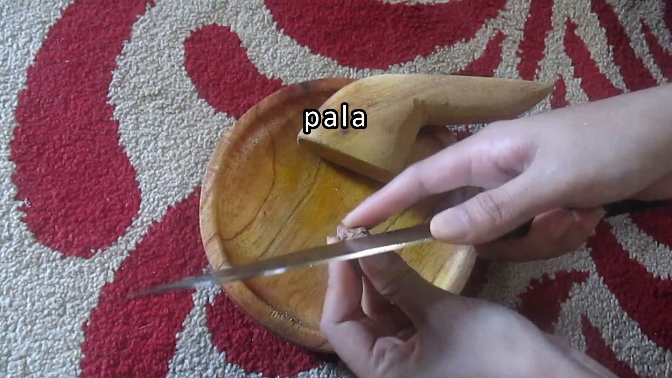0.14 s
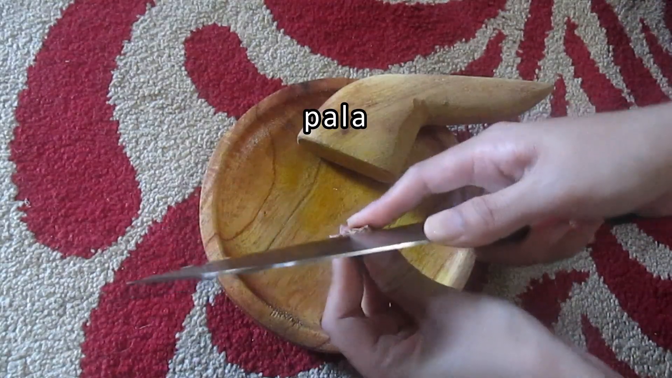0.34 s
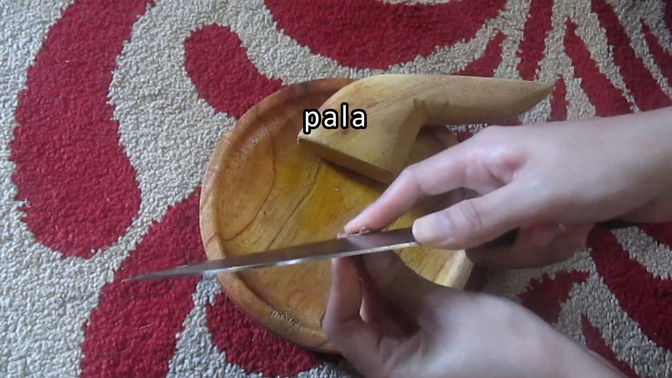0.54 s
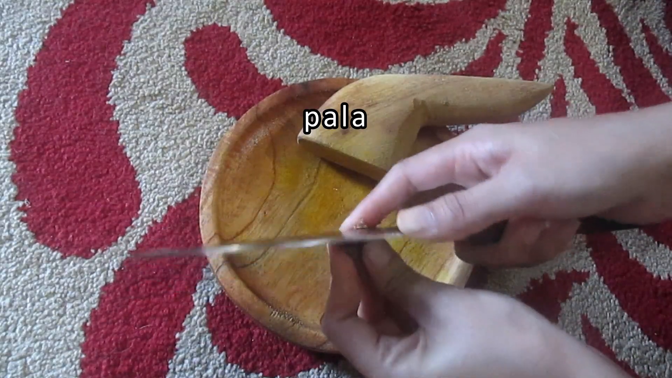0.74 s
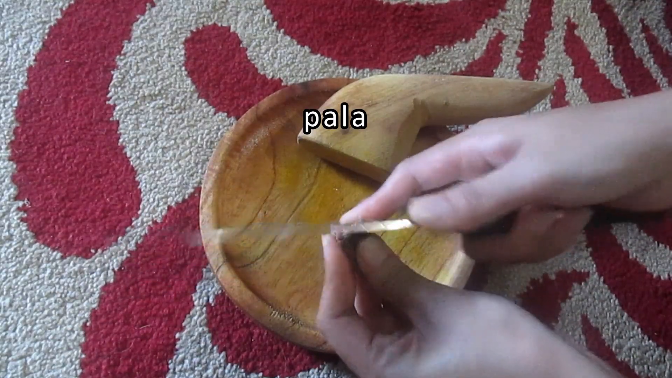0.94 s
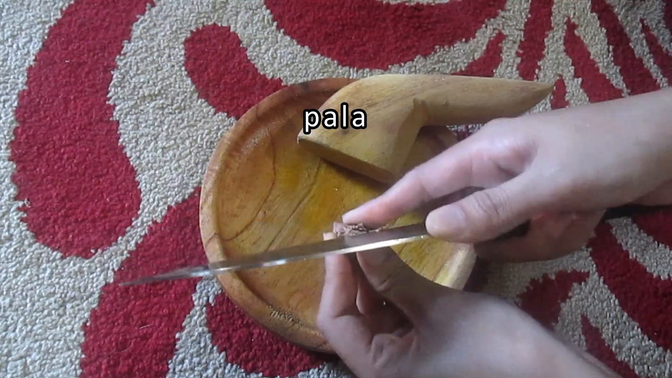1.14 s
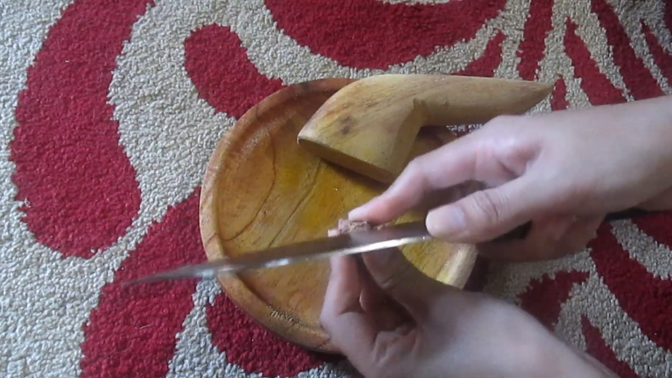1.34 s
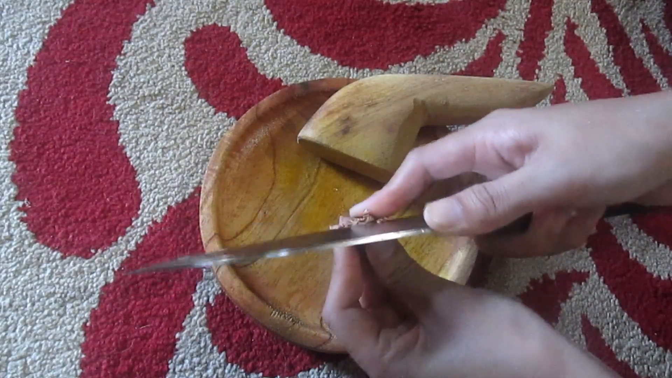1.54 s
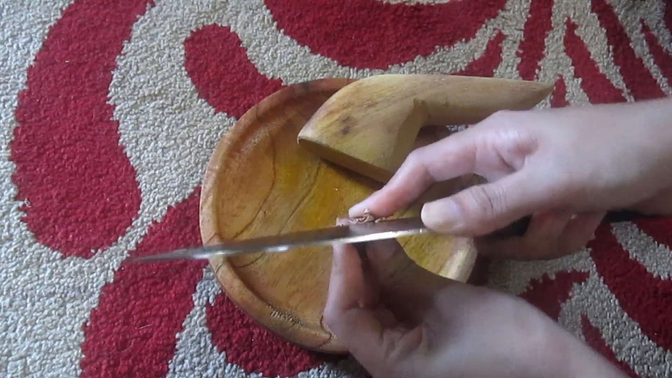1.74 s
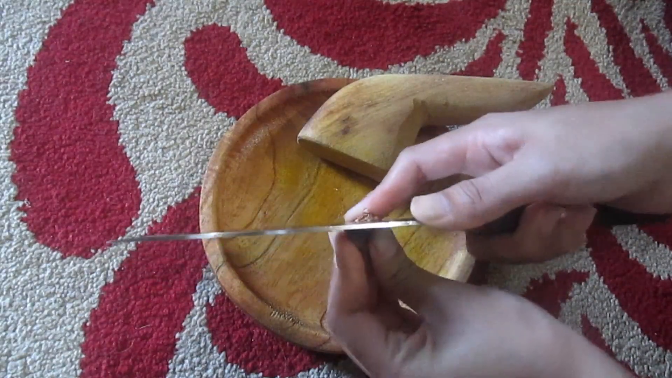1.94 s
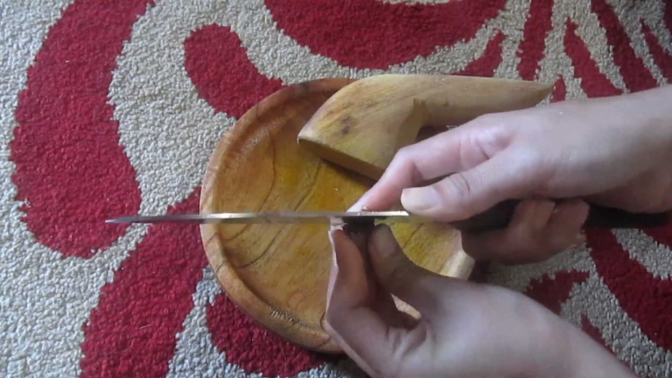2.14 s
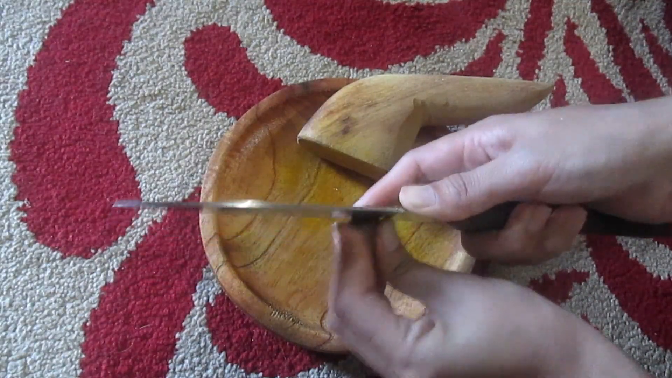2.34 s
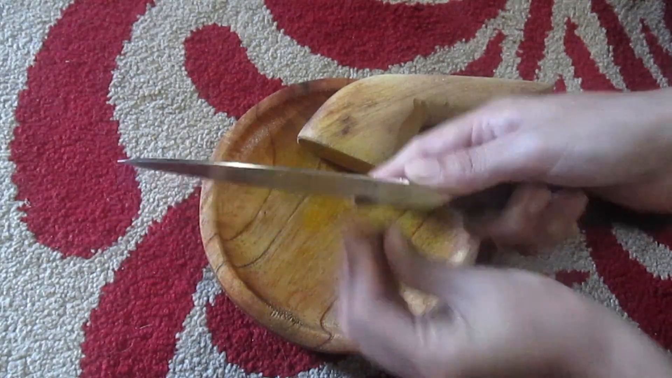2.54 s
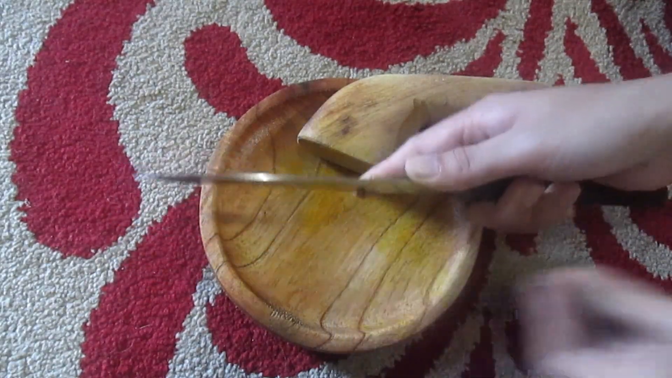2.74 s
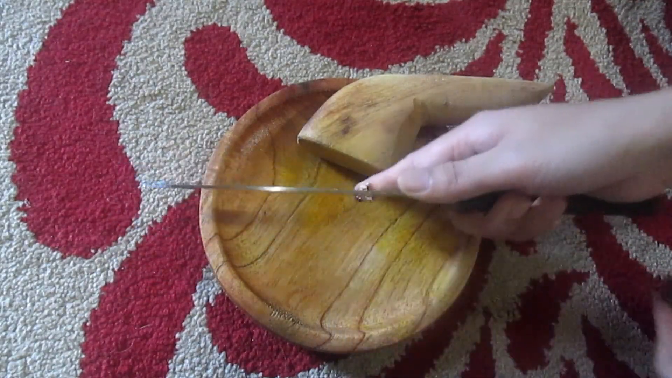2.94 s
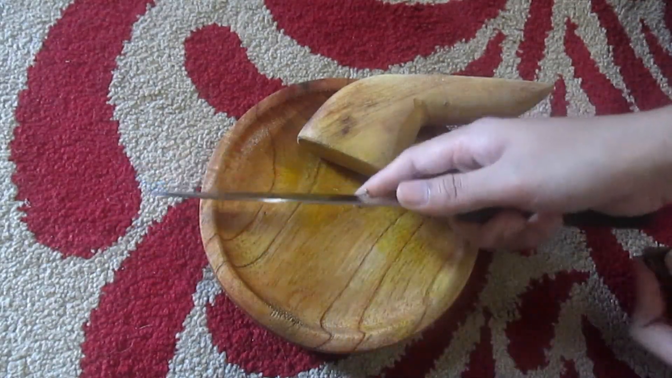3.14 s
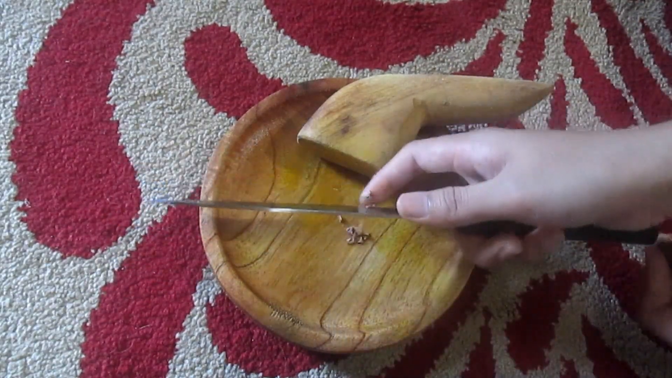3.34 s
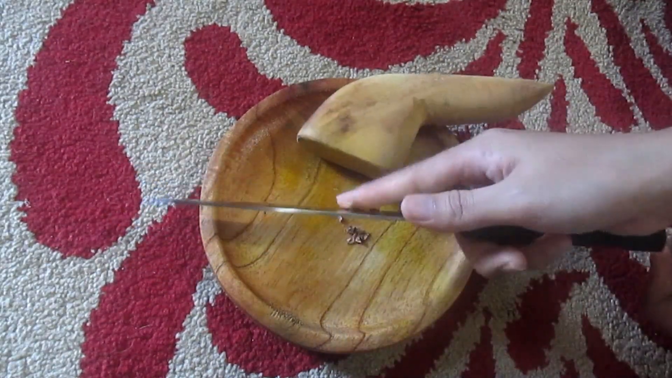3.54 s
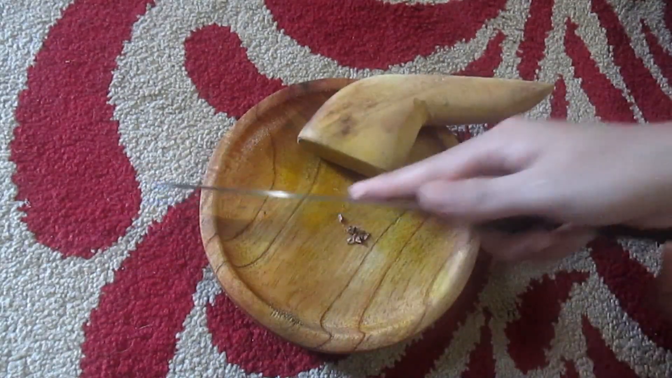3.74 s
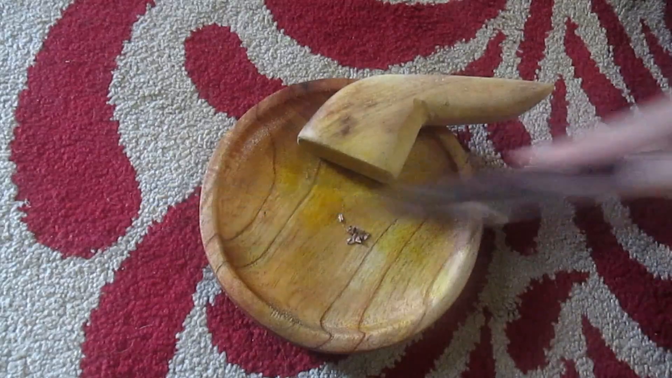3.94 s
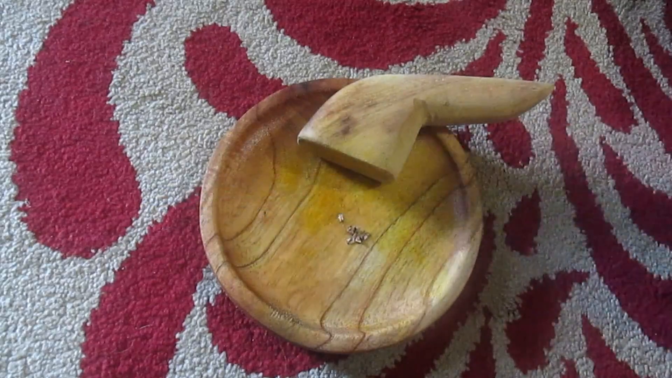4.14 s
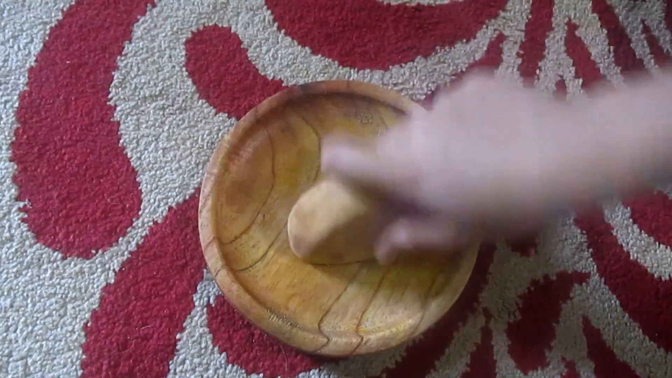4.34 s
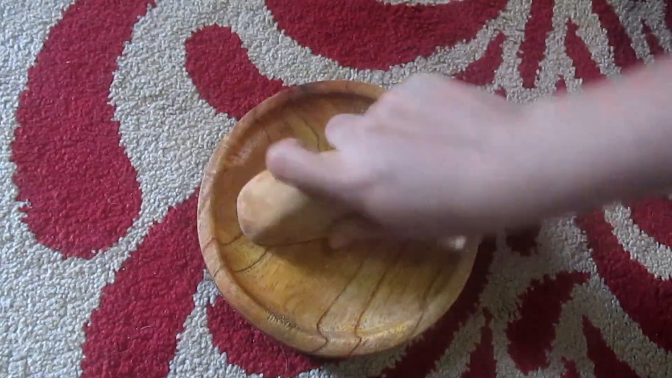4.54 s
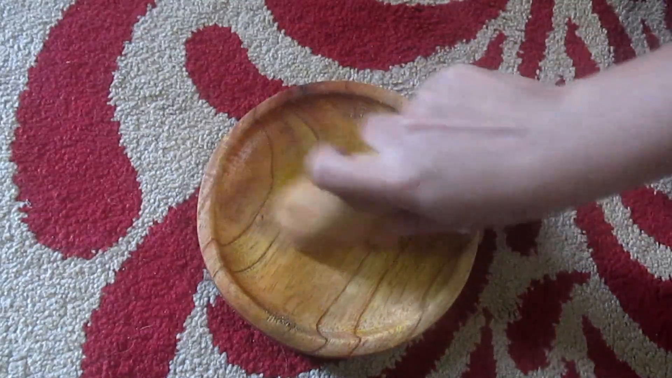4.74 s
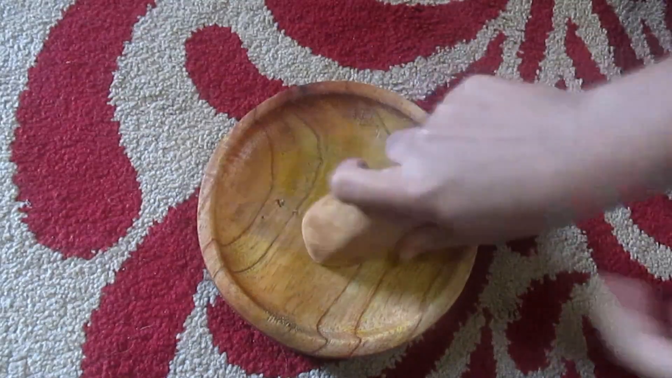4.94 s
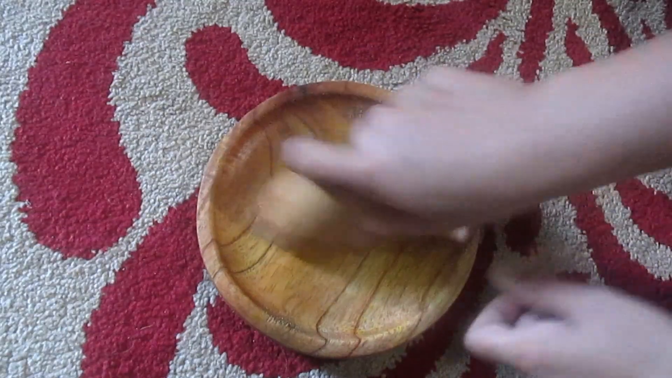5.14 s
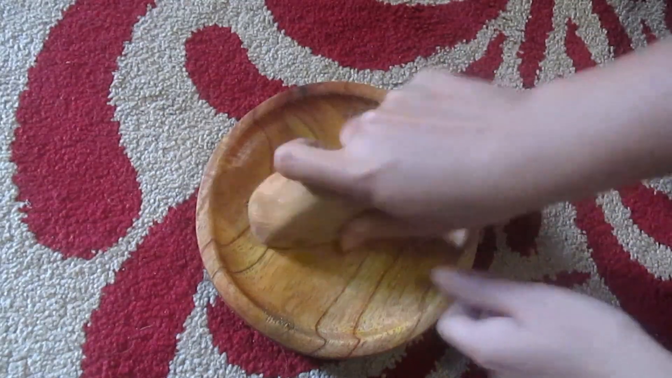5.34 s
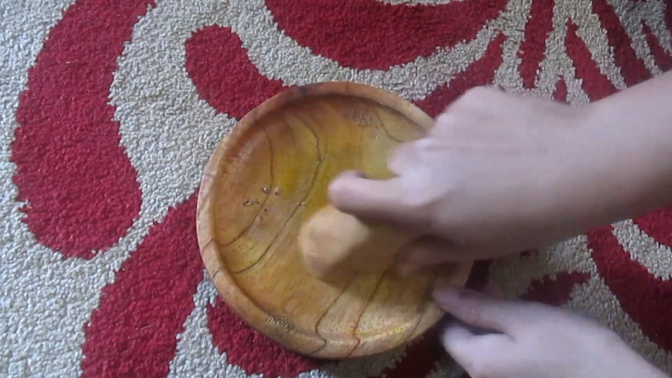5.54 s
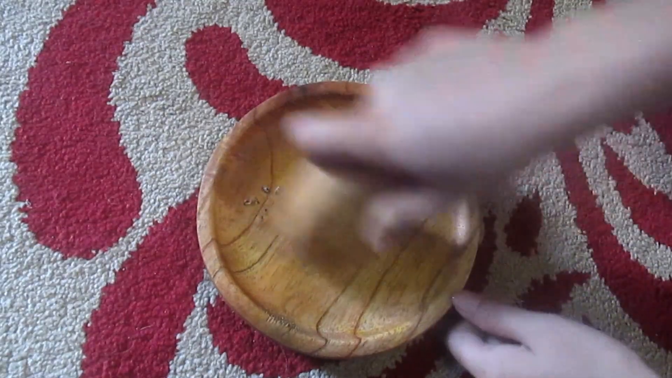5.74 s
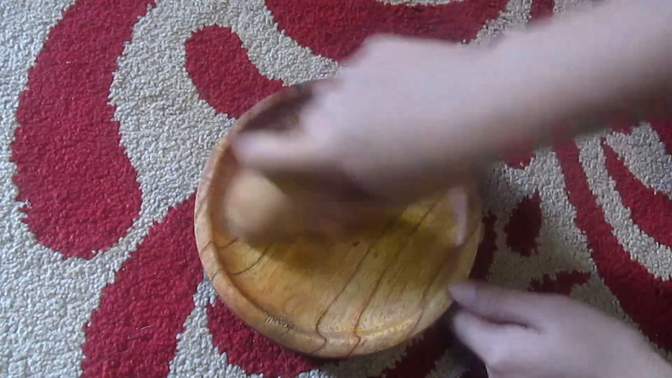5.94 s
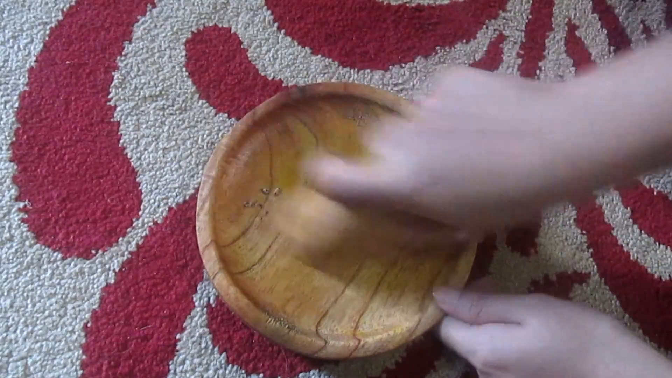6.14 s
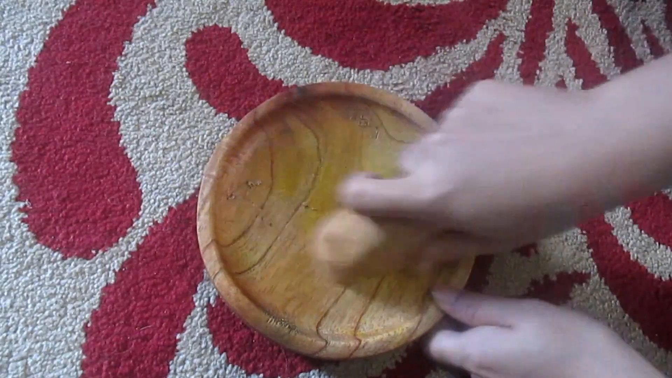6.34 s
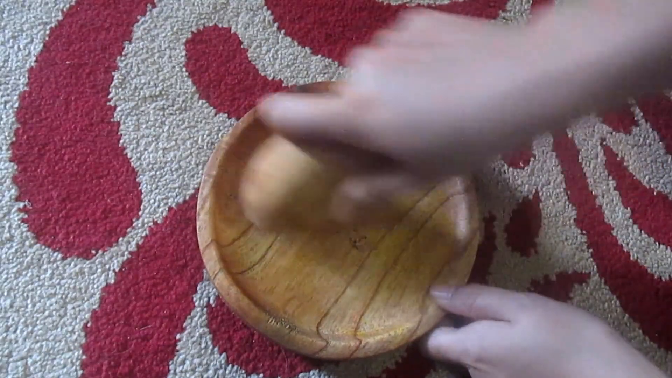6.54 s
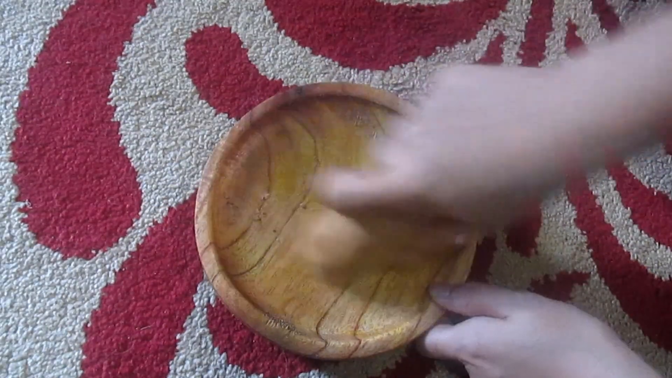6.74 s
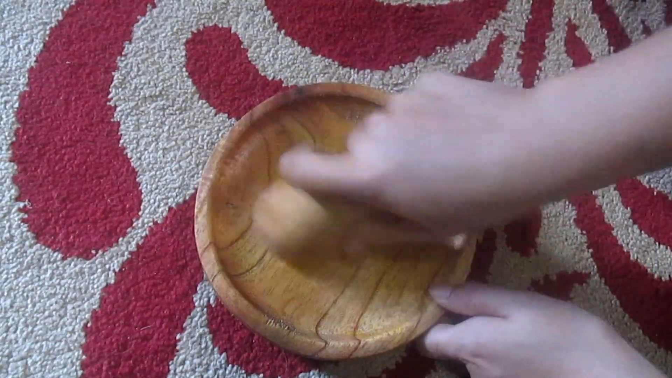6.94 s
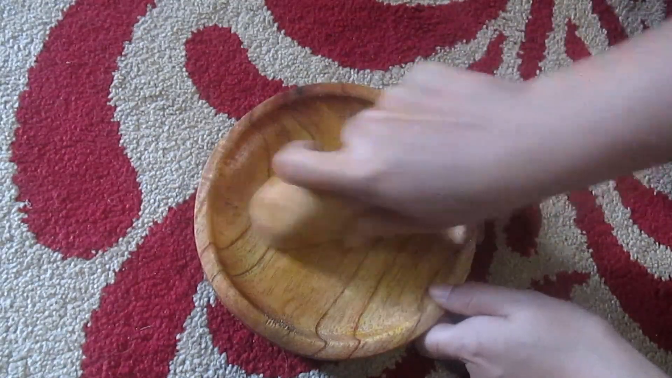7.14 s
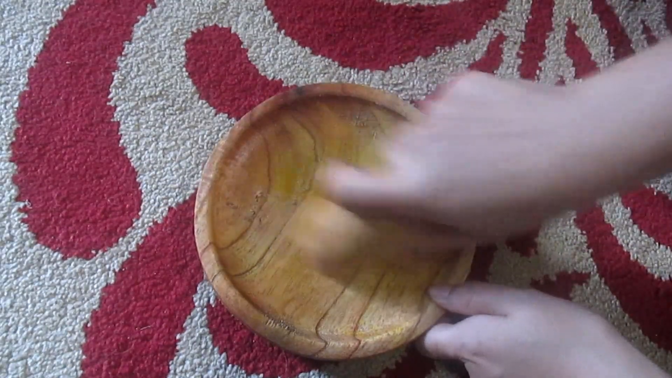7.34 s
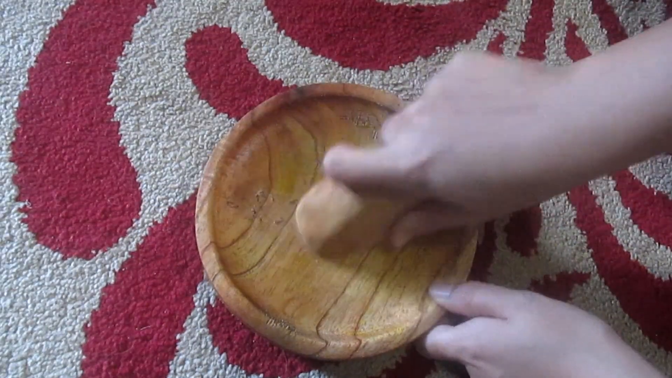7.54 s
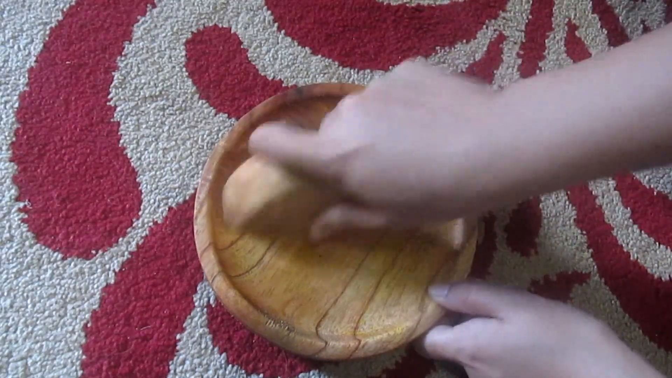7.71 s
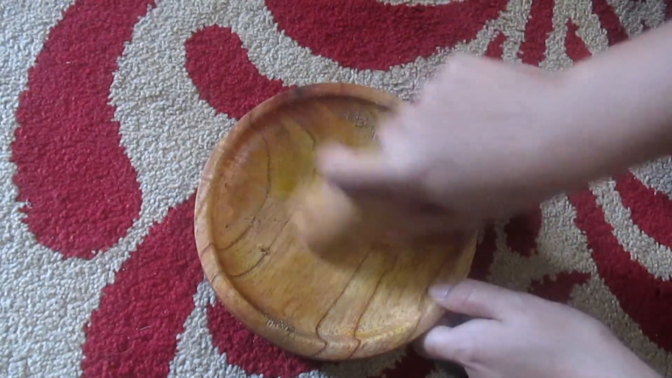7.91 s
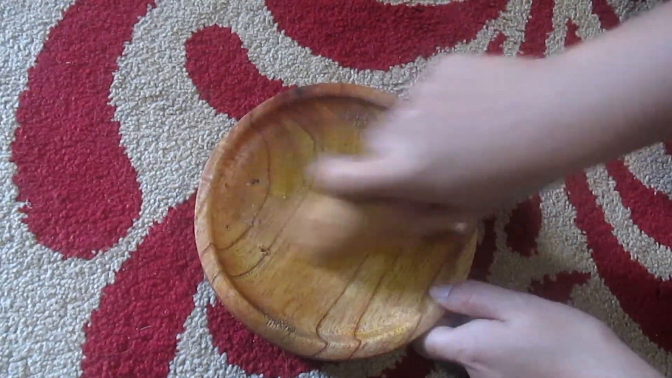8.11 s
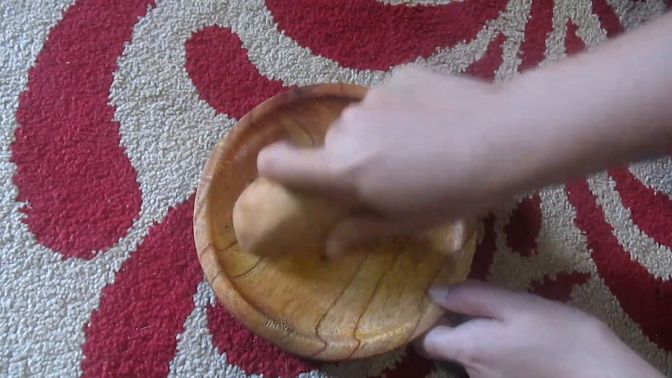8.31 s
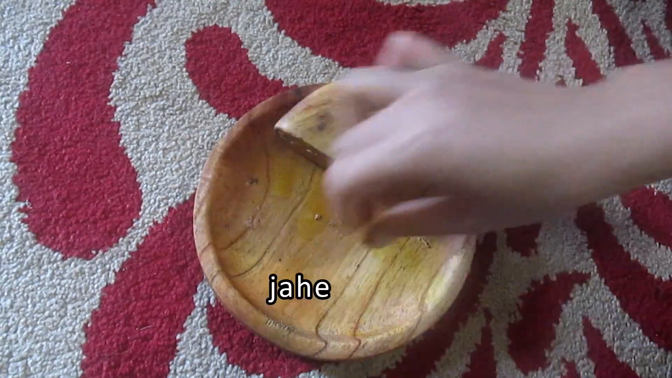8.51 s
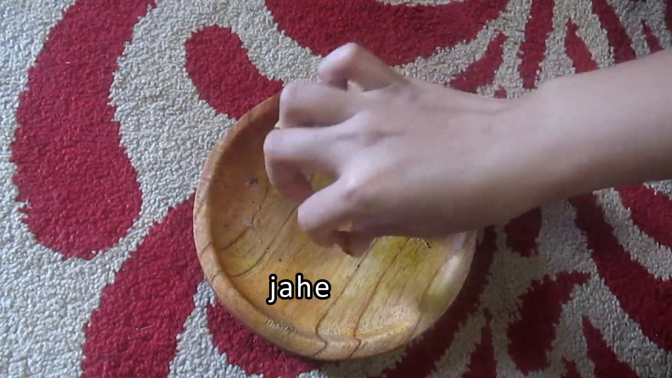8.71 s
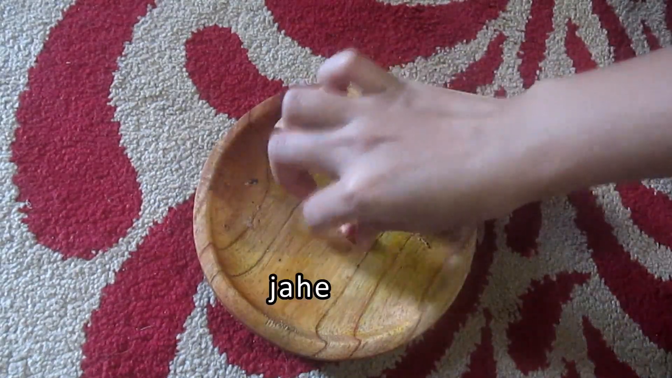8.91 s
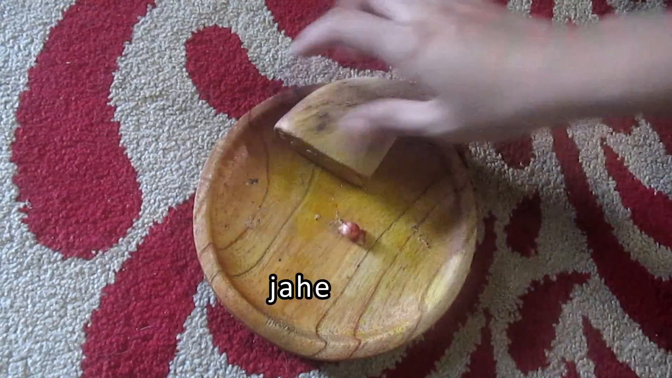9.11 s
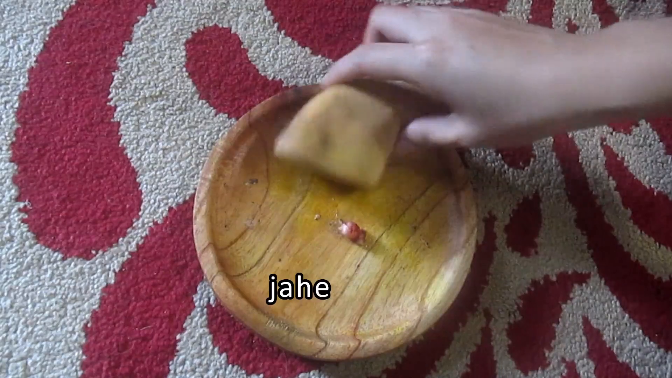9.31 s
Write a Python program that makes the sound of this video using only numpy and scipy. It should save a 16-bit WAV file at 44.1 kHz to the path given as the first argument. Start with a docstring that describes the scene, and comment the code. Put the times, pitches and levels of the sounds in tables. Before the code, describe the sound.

A wooden pestle and mortar are heard close up in a quiet room with soft rumble and hiss. First come scattered, delicate clicks of a knife cutting hard spice. About halfway through, a hard wooden knock briefly overloads the microphone, and rapid rubbing strokes begin crushing the spice, with small bumps and a few sharp knocks among them. The rubbing ends shortly before one last light tap.

```python
"""First come small, crisp snips over a low room hum: a knife cuts hard spice above a shallow wooden
mortar that stands on a rug. Then a wooden pestle cracks the pieces with a few sharp knocks that make
the dish ring, and grinds them in quick, gritty back-and-forth strokes. The close microphone overloads
on the hardest knocks, and its limiter turns the sound down for a moment."""
import sys
import numpy as np
from scipy import signal
from scipy.fft import rfft, irfft, next_fast_len
from scipy.io import wavfile
from scipy.ndimage import uniform_filter1d

SR = 44100
rng = np.random.default_rng(int(sys.argv[2]) if len(sys.argv) > 2 else 0)


def output_pcm(signal):
    """Save a mono or channel-first signal as 16-bit PCM at the path in sys.argv[1].

    Samples are clipped to [-1, 1] before scaling.
    """
    pcm = np.clip(np.atleast_2d(signal).T, -1, 1) * 32767
    wavfile.write(sys.argv[1], SR, np.round(pcm).astype(np.int16))


N = 413327
TIME = np.arange(N) / SR

# The mortar's modes, the tones it rings with: f/Hz, level/dB, t60/s (time to fade by 60 dB)
DISH = [(204, -12.5, 0.067), (375, -20, 0.034), (572, 0, 0.027), (725, 5.5, 0.025), (808, 2.5, 0.032),
        (939, 2, 0.027)]  # the whole dish bending
FLOOR = [(1080, 1, 0.017), (1228, -1, 0.033), (1390, 3, 0.01), (1594, -7.5, 0.036), (1790, -12.5, 0.036)]  # its floor
RIM = [(2200, -8, 0.007), (2415, -4, 0.02), (2730, 0.5, 0.004), (3114, -3.5, 0.012), (3230, -1, 0.0073),
       (3580, -4.5, 0.0091)]  # its rim
# Tone colour of cracking spice: f/Hz, level/dB
CRACK_SPECTRUM = [(800, 4.5), (1800, 10.5), (3200, -0.5), (5200, -12.5), (6500, -34), (10000, -32),
                  (15500, -38)]
# How alike the spice sounds left and right: f/Hz, likeness (1 = the same)
SPICE_LIKENESS = [(700, 0.47), (3500, 0.79), (5000, 0.66), (7500, 0.26), (10000, 0.22), (15000, 0.24)]
# The pestle hits the dish: t/s, level/dB, thud f/Hz, clack f/Hz,
# then clack, crack and thump level/dB compared with the thud
KNOCKS = [(4.3059, 7, 750, 1200, 2, -2, -18.5), (4.5385, -26, 736, 1250, 8, -18, -18),
          (5.1250, -9.5, 732, 930, -21, -30, -8.5), (5.8483, -3.5, 654, 1520, 3.5, -32, -23.5),
          (6.5649, 1, 656, 1430, 3, -13, -20), (7.7650, -7.5, 750, 1170, 0, -8.5, -19),
          (9.189, -33.5, 700, 1500, -14, -10.5, -15)]
# The pestle rides over a hard piece and bumps down: t/s, level/dB
BUMPS = [(4.864, -33), (5.1362, -27), (5.406, -31), (5.910, -23), (5.952, -27), (6.254, -23.5),
         (6.673, -21), (6.766, -31.5), (6.956, -17.5), (7.907, -20), (8.328, -19.5), (8.479, -22)]

def knocks(contact_hz=2180, thud_t60=0.032, clack_t60=0.0062, crack_t60=0.023, thump_hz=350):
    """The dish thuds at a pitch set by where it is hit; the pestle clacks and the spice cracks."""
    out, t = np.zeros((2, N)), TIME[:SR // 10]
    soften = signal.butter(3, contact_hz, fs=SR, output="sos")  # wood on wood is a soft contact
    tap = signal.sosfilt(soften, signal.unit_impulse(len(t)))
    body = from_db(-13) * peak_one(ring(tap, DISH))
    overtones = from_db(-9) * peak_one(ring(tap, FLOOR)) + from_db(-22) * peak_one(ring(tap, RIM))
    thump = peak_one(high_pass(ring(tap, [(thump_hz, 0, 0.014)]), hz=200))  # the pestle's own dull body thumps
    bumps = [(s, db, 732, 1220, -15, -13.5, -14) for s, db in BUMPS]  # same columns as KNOCKS
    for s, db, thud_hz, clack_hz, clack_db, crack_db, thump_db in list(KNOCKS) + bumps:
        thud = peak_one(high_pass(ring(tap, [(thud_hz, 0, thud_t60)]), hz=566)) + body
        clack = peak_one(high_pass(ring(tap, [(clack_hz, 0, clack_t60)]) + overtones, hz=870))
        crack = peak_one(colour(noise(len(t)), CRACK_SPECTRUM, SPICE_LIKENESS) * fade(t, crack_t60))
        crack += from_db(-16) * peak_one(ring(crack, RIM))  # splinters set the rim ringing
        hit = thud + from_db(clack_db) * clack + from_db(crack_db) * crack + from_db(thump_db) * thump
        add(out, s, from_db(db) * hit)
    return pan(out, left_db=-2.34)


# Tone colour of the powder: f/Hz, level/dB
GRIT_SPECTRUM = [(3000, 1.5), (3800, -8), (4400, -3), (4800, -11), (5300, 2), (6200, -2.5), (7000, -3.5),
                 (8300, -6.5), (9500, -6.5), (10700, -12.5), (12500, -9), (15500, -15)]

def grinding():
    """Coarse pieces jolt the whole dish, finer ones ring its floor and rim, and the powder hisses."""
    jolts = rubbed(DISH, per_s=900, spread_db=3, wander_db=4.5, low_hz=212)
    pestle = rubbed([(454, 0, 0.0077)], per_s=1200, spread_db=5.5, wander_db=18.5, low_hz=224)
    judder = (jolts + from_db(-8) * pestle) * strokes(per_weight=1, per_bite=0, sharpness=2.46)
    rub = rubbed(FLOOR, per_s=1400, spread_db=4.5, wander_db=0.5, low_hz=800)
    rub *= strokes(per_weight=0.85, per_bite=0.58, sharpness=2.35)
    scrape = rubbed(RIM, per_s=1500, spread_db=3, wander_db=4, low_hz=1510)
    scrape *= strokes(per_weight=0, per_bite=1, sharpness=1.5)
    powder = np.array([grains(per_s=5000, spread_db=1.5) for side in range(2)])
    grit = colour(powder, GRIT_SPECTRUM, SPICE_LIKENESS) * from_db(2 * drift(200))
    grit *= strokes(per_weight=0, per_bite=0.82, sharpness=1)
    return (from_db(-33.5) * pan(judder, left_db=-2) + from_db(-39.5) * pan(rub, left_db=-3.5)
            + from_db(-47.5) * pan(scrape, left_db=-4.5) + from_db(-47.5) * pan(grit, left_db=1.3))


# Grinding strokes: t/s at top speed, length/s, weight on the pestle/dB, bite into the spice/dB
STROKES = [(4.459, 0.12, 0.5, -3.5), (4.611, 0.11, -1.5, -8), (4.733, 0.13, -13.5, -8),
           (4.876, 0.088, -1, 2), (5.007, 0.12, -2.5, 1), (5.145, .11, -1, -1), (5.273, 0.12, -1, 0.5),
           (5.401, 0.12, -1.5, .5), (5.512, .08, -13.5, -5), (5.988, 0.18, -0.5, -8.5),
           (6.141, .13, .5, -1.5), (6.284, 0.15, 0.5, 4.5), (6.695, 0.14, 3.5, -3.5), (6.837, .12, 0.5, -1),
           (6.958, 0.11, 3.5, 0.5), (7.088, .14, 0.5, 2), (7.213, .13, 1, 0), (7.342, 0.11, 2, 2),
           (7.478, 0.13, -5, -1.5), (7.637, 0.26, -7.5, -5), (7.774, 0.2, -4, -4),
           (7.909, 0.17, -3.5, -2.5), (8.075, 0.16, 1, -2), (8.209, .14, 1, -1), (8.353, 0.16, -2.5, -0.5),
           (8.491, 0.096, 0.5, 2.5)]

def strokes(per_weight, per_bite, sharpness, speed_up_share=0.54, lift_s=8.503, lift_fade_s=0.0037):
    """Loudness of the strokes: each speeds up and slows down; weight, bite and speed make it louder."""
    power = np.zeros(N)
    for s, length, weight_db, bite_db in STROKES:
        t, rise = TIME[:int(length * SR)], speed_up_share * length
        speed = np.abs(np.sin(np.pi * np.interp(t, [0, rise, length], [0, .5, 1])))
        strength = from_db(per_weight * weight_db + per_bite * bite_db)
        add(power, s - rise, (strength * speed ** sharpness) ** 2)
    touching = np.clip(1 - (TIME - lift_s) / lift_fade_s, 0, 1)  # the pestle lifts off in mid-stroke
    return np.sqrt(power) * touching


def rubbed(modes, per_s, spread_db, wander_db, low_hz):
    """Crushed grains ring the modes; each swells and fades as the pestle crosses its still spots."""
    force = grains(per_s, spread_db)
    rings = sum((-1) ** k * ring(force, [mode]) * from_db(wander_db * drift(14))
                for k, mode in enumerate(modes))
    rings = high_pass(rings, low_hz)
    loudness = np.sqrt(uniform_filter1d(rings ** 2, size=SR // 16) + 1e-12)
    return rings / loudness  # the hand keeps a steady pressure


# The knife snaps through spice: t/s, level/dB, centre f/Hz, t60/s
SNIPS = [(0.399, -40, 4200, .03), (0.554, -41.5, 4560, 0.11), (0.698, -41, 4770, 0.07),
         (1.327, -46, 4500, .04), (1.523, -41, 6000, 0.017), (1.531, -34.5, 4900, 0.019),
         (1.753, -28, 4600, 0.037), (1.783, -41, 6000, 0.13), (1.993, -45, 11000, .04),
         (2.270, -27.5, 12500, 0.012), (2.320, -36.5, 7000, 0.084), (2.663, -40, 10000, 0.17),
         (3.928, -37.5, 6800, 0.036)]
# The blade's modes: f/Hz, level/dB, t60/s
BLADE = [(3500, 2.5, 0.012), (4914, -2, 0.033), (13800, -13, .012)]

def knife(edge_db=-7, blade_db=-29):
    """Each snap is a short, gritty burst around a centre pitch, and the held blade rings faintly."""
    out, t = np.zeros((2, N)), TIME[:SR // 10]
    for s, db, hz, t60 in SNIPS:
        splinters = noise(len(t)) * from_db(5.2 * rng.standard_normal(len(t)))
        spectrum = [(hz / 4, 2 * edge_db), (hz / 2, edge_db), (hz, 0), (hz * 3, edge_db)]
        burst = colour(splinters, spectrum, SPICE_LIKENESS) * fade(t, t60)
        add(out, s, from_db(db + 3.5) * peak_one(burst))
    return out + from_db(blade_db) * ring(out, BLADE)


# A loose crumb drops into the dish: t/s, level/dB
CRUMBS = [(3.225, -42), (5.198, -44)]

def crumbs(floor_db=-3):
    """Falling crumbs make tiny woody ticks on the rim and floor of the dish."""
    out, tap = np.zeros((2, N)), signal.unit_impulse(SR // 10)
    tick = peak_one(ring(tap, RIM)) + from_db(floor_db) * peak_one(ring(tap, FLOOR))
    for s, db in CRUMBS:
        add(out, s, from_db(db) * tick)
    return out


# Tone colour of the echo from the walls: f/Hz, level/dB
ECHO_SPECTRUM = [(150, -22), (450, 0), (750, -3), (1700, -8), (3300, -7.5), (4200, -14), (7000, -8.5),
                 (15000, -24.5)]
# How alike the echo is left and right: f/Hz, likeness
ECHO_LIKENESS = [(200, 1), (1200, 0.66), (3000, 0.37), (8000, .1)]

def room_echo(x, t60=0.36, build_s=0.024):
    """The rug soaks up the first echoes; a dull tail builds up from the walls."""
    t = TIME[:SR // 2]
    build_up = 1 - np.exp(-(t / build_s) ** 2)
    tail = colour(noise(len(t)), ECHO_SPECTRUM, ECHO_LIKENESS) * fade(t, t60) * build_up
    return signal.fftconvolve(x, rms_one(tail) / np.sqrt(len(t)), axes=1)[:, :N]


# Tone colour of the low room noise: f/Hz, level/dB
RUMBLE_SPECTRUM = [(13, -44), (22, -37), (38, -7), (70, -2.5), (113, -7), (173, -6), (206, -8.5),
                   (240, -7.5), (280, -16), (428, -8), (499, -16), (1060, -19.5), (1330, -26.5),
                   (1850, -27), (2200, -39.5), (2860, -59), (4840, -120)]
# How alike the background noise is left and right: f/Hz, likeness
AIR_LIKENESS = [(30, 0.86), (150, 0.64), (450, 0.76), (1000, 0.53), (2000, 0.14), (3500, 0.018),
                (15000, 0.045)]
# The tones of the hum: f/Hz, level/dB, phase wobble/rad
HUM_TONES = [(99.9, -58.5, 0.43), (119.3, -57.5, 0.6), (166.6, -59.5, 1.52)]
# Slow rises and falls: t/s, rumble change/dB, hum change/dB
SWELLS = [(0, 3, -2), (.5, -.5, 4.5), (2.0, 1, 6.5), (3.3, 1, -2), (4.15, 1.5, 4), (4.4, -2.5, -9),
          (5.4, 1, -6), (8.2, 2, -4.5), (9.0, 0, 4.5)]

def room_drone(air_db=-44.86, waver_db=3):
    """The room rumbles softly under a wavering hum."""
    s, rumble_db, hum_db = np.transpose(SWELLS)
    air = from_db(air_db) * colour(noise(N), RUMBLE_SPECTRUM, AIR_LIKENESS)
    bass = signal.sosfiltfilt(signal.butter(2, 260, fs=SR, output="sos"), air)
    rumble = air - bass + bass * from_db(np.interp(TIME, s, rumble_db))  # only the bass swells
    hum = sum(from_db(db + waver_db * drift(3.6)) * np.sin(2 * np.pi * hz * TIME + wobble * drift(14))
              for hz, db, wobble in HUM_TONES)
    return rumble + np.sqrt(2) * hum * from_db(np.interp(TIME, s, hum_db))


# Tone colour of the microphone's hiss: f/Hz, level/dB
HISS_SPECTRUM = [(1200, -21), (2200, 1), (3200, 1), (4300, -2.5), (5200, 0), (6700, 0.5), (7400, 6),
                 (7850, 4), (8000, -7), (8180, 8.5), (8450, 1), (9400, -1), (10500, -9.5), (13000, -8.5),
                 (15700, -13.5)]

def hiss_and_whine(whine_hz=3020):
    """The microphone hisses steadily, and a thin whine sits on the right."""
    hiss = from_db(-59.5) * colour(noise(N), HISS_SPECTRUM, AIR_LIKENESS)
    whine = from_db(-78.5) * np.sin(2 * np.pi * whine_hz * TIME + drift(29))
    return hiss + pan(whine, left_db=-18.5)


def ring(force, modes):
    """A push sets each mode ringing as a fading tone; neighbours swing in opposite directions."""
    out = 0
    for k, (hz, db, t60) in enumerate(modes):
        r, w = fade(1 / SR, t60), 2 * np.pi * hz / SR
        tone = signal.lfilter([0, np.sin(w)], [1, -2 * r * np.cos(w), r * r], force + 1e-18)
        out = out + (-1) ** k * from_db(db) * tone
    return out


def grains(per_s, spread_db):
    """Random tiny impacts, mostly small and a few large."""
    sizes = from_db(spread_db * np.minimum(rng.exponential(1, N), 5)) * rng.choice([-1, 1], N)
    return sizes * (rng.random(N) < per_s / SR)


def colour(pair, spectrum, likeness):
    """Turn two unrelated signals into one stereo sound with this tone colour and likeness."""
    n = pair.shape[-1]
    size = next_fast_len(n)
    hz = np.fft.rfftfreq(size, 1 / SR)
    mid, side = rfft(pair, size) * from_db(at_hz(spectrum, hz))
    alike = np.clip(at_hz(likeness, hz), -1, 1)
    left_right = np.sqrt(1 + alike) * mid + np.sqrt(1 - alike) * side * [[1], [-1]]
    return rms_one(irfft(left_right, size)[:, :n])


def at_hz(points, hz):
    """Read between a table's rows, with octaves evenly spaced."""
    f, value = np.transpose(points)
    return np.interp(np.log(hz + 1), np.log(f), value)


def drift(per_s):
    """A random wobble of typical size 1."""
    knots = rng.standard_normal(int(N / SR * per_s) + 2)
    return rms_one(np.interp(TIME * per_s, np.arange(len(knots)), knots))


def noise(n):
    return rng.standard_normal((2, n))


def high_pass(x, hz):
    return signal.sosfilt(signal.butter(2, hz, "high", fs=SR, output="sos"), x)


def from_db(db):
    return 10 ** (np.asarray(db) / 20)


def rms_one(x):
    return x / np.sqrt(np.mean(x ** 2) + 1e-20)


def peak_one(x):
    return x / np.max(np.abs(x))


def fade(t, t60):
    return np.exp(-np.log(1000) * t / t60)


def add(out, s, sound):
    """Mix a sound in at time s."""
    i = int(s * SR)
    out[..., i:i + sound.shape[-1]] += sound[..., :N - i]


def pan(x, left_db):
    """Make the left side left_db louder than the right."""
    return x * from_db([[left_db / 2], [-left_db / 2]])


def scene():
    """Pestle, mortar and knife close by, in a quiet room."""
    work = knocks() + grinding() + knife() + crumbs()
    return work + from_db(-24) * room_echo(work) + room_drone() + hiss_and_whine()


def record(dry, release_db_per_s=30, attack_s=0.0019, ahead_s=0.0019, cutoff_hz=15850):
    """A limiter turns loud peaks down and slowly lets go; what slips past clips; top treble is cut."""
    over_db = np.maximum(20 * np.log10(np.abs(dry).max(axis=0) + 1e-9), 0)
    over_db = np.interp(TIME + ahead_s, TIME, over_db)
    held_db = np.maximum.accumulate(over_db + release_db_per_s * TIME) - release_db_per_s * TIME
    r = np.exp(-1 / (attack_s * SR))
    duck_db = signal.lfilter([1 - r], [1, -r], held_db)
    limited = np.clip(dry * from_db(-duck_db), -1, 1)
    return signal.sosfilt(signal.ellip(10, .1, 70, cutoff_hz, fs=SR, output="sos"), limited)


dry = scene()
out = record(dry)
output_pcm(out)
```